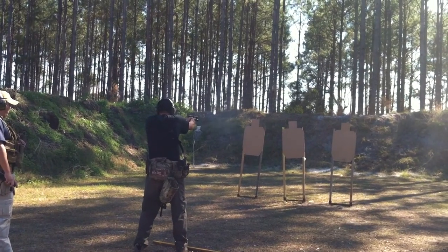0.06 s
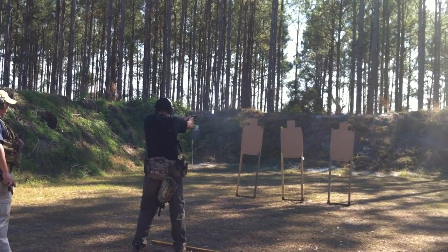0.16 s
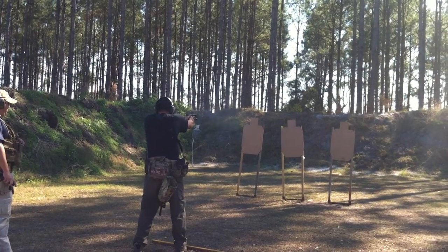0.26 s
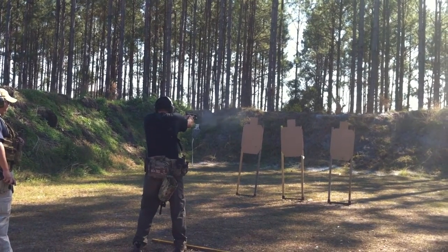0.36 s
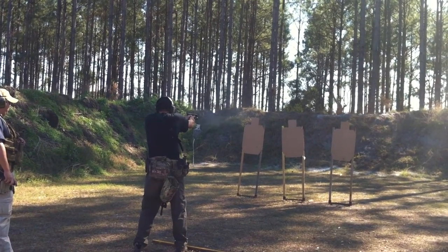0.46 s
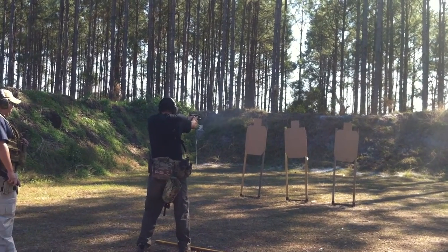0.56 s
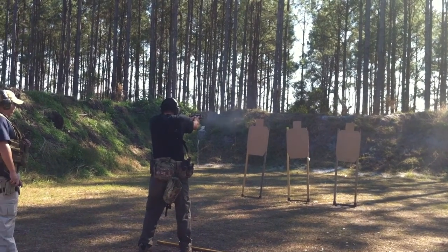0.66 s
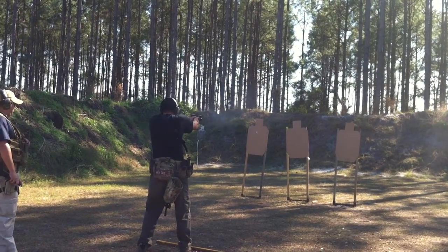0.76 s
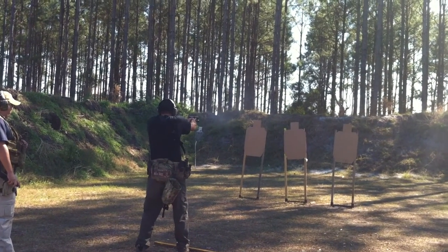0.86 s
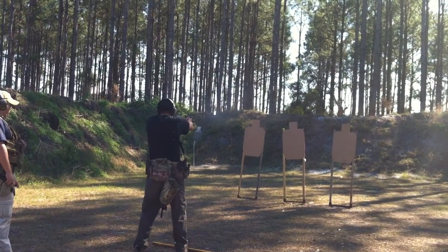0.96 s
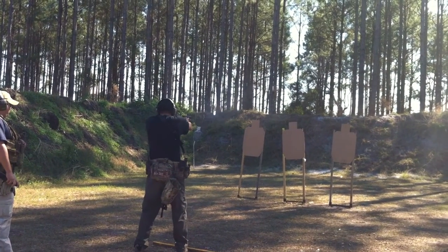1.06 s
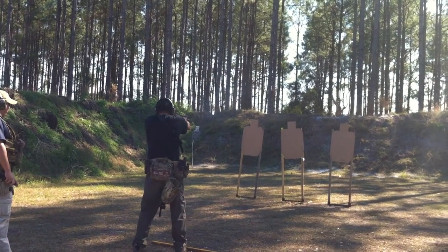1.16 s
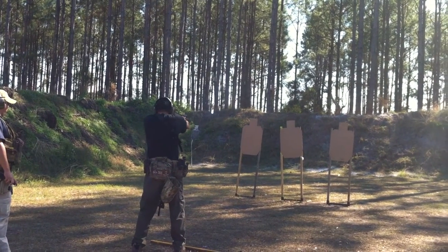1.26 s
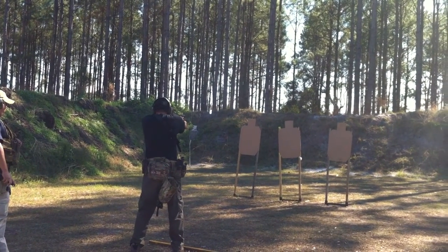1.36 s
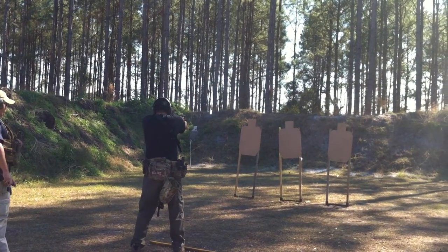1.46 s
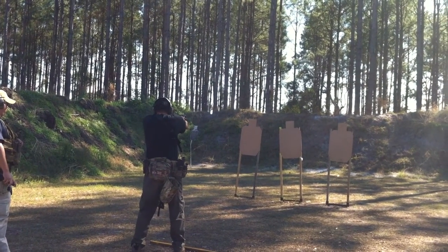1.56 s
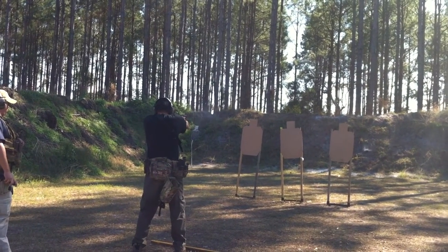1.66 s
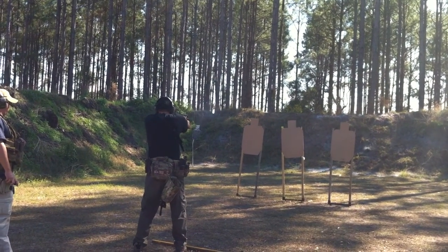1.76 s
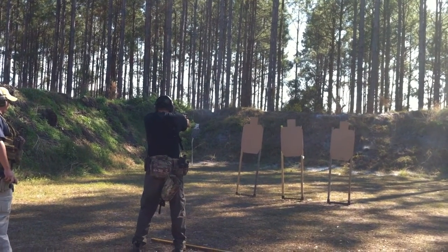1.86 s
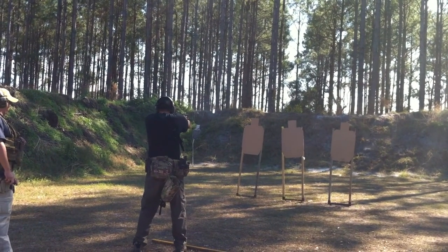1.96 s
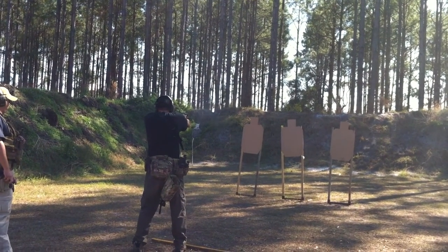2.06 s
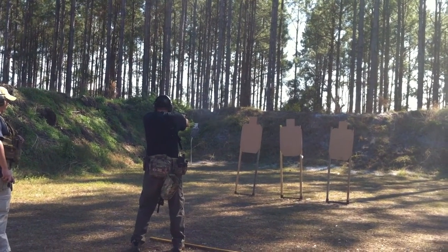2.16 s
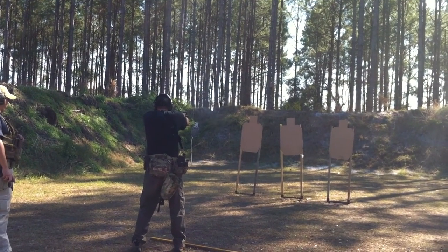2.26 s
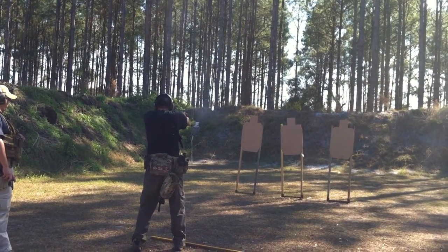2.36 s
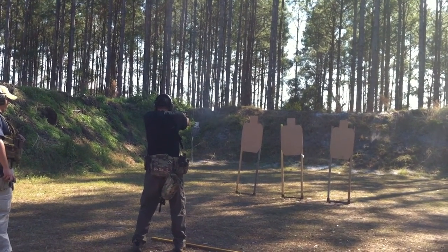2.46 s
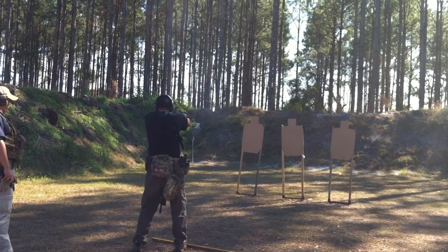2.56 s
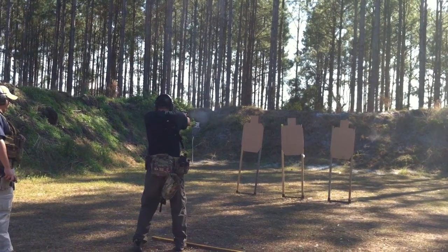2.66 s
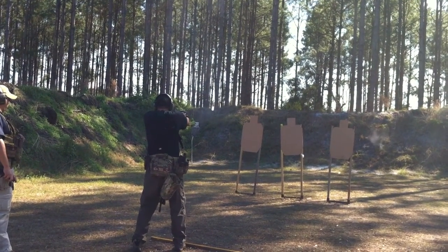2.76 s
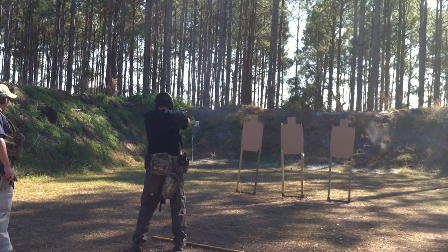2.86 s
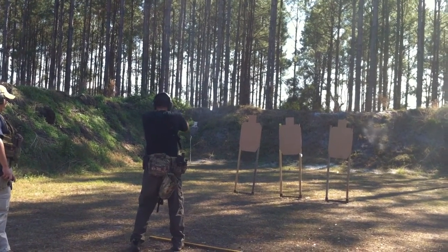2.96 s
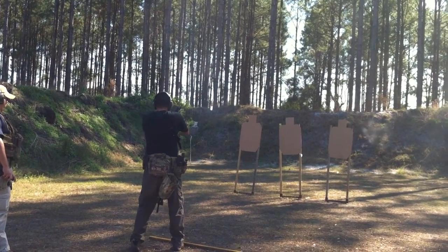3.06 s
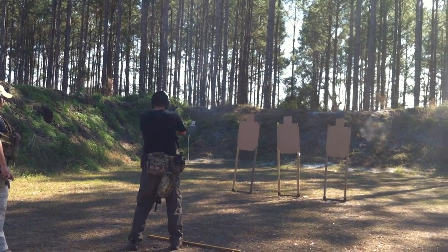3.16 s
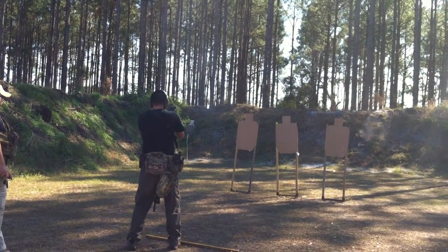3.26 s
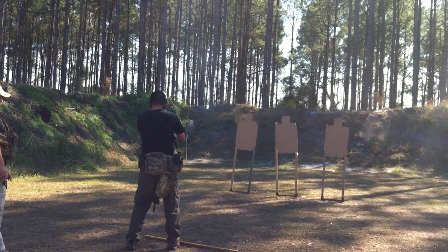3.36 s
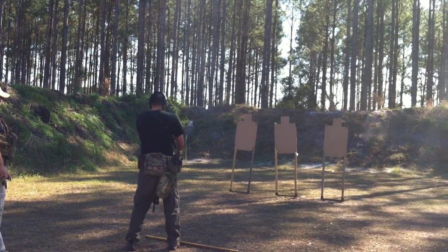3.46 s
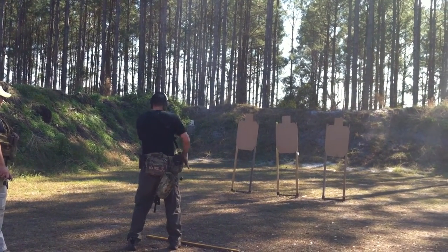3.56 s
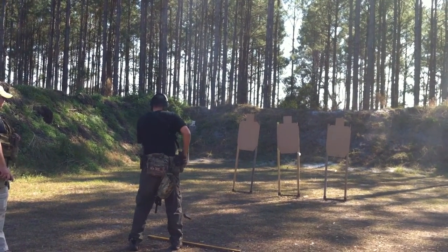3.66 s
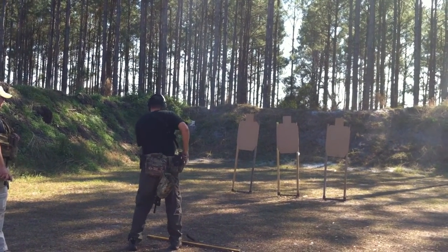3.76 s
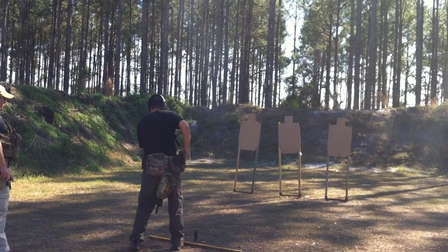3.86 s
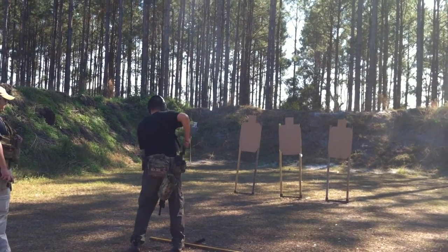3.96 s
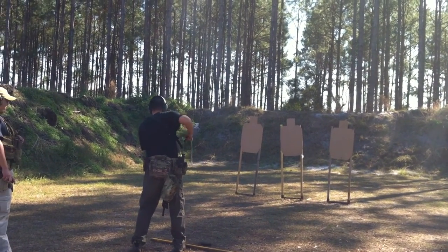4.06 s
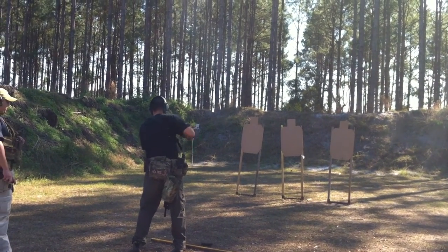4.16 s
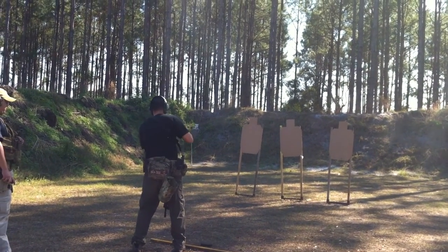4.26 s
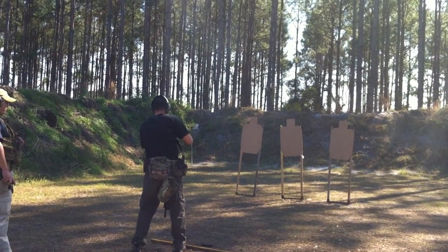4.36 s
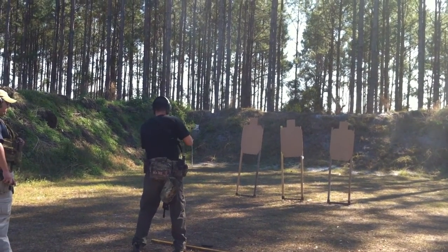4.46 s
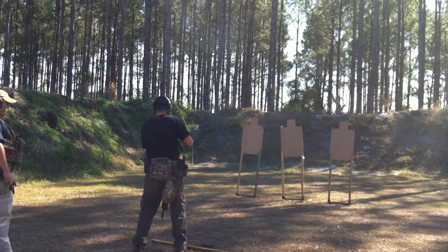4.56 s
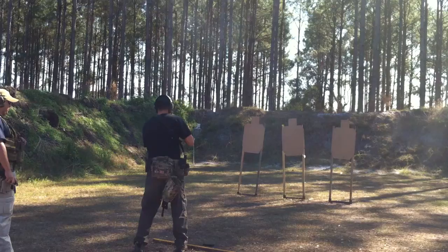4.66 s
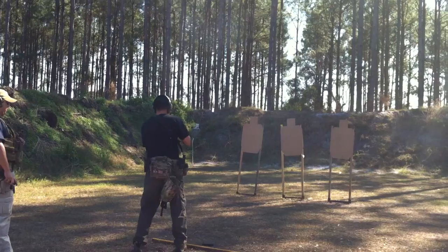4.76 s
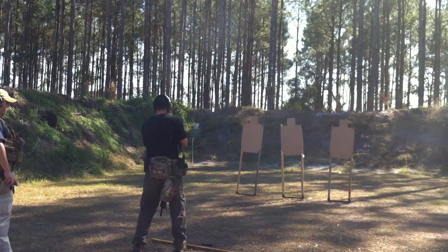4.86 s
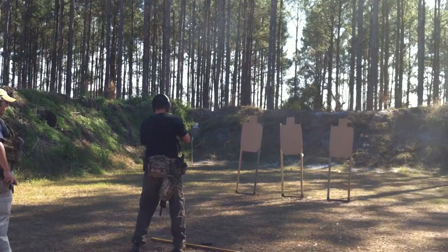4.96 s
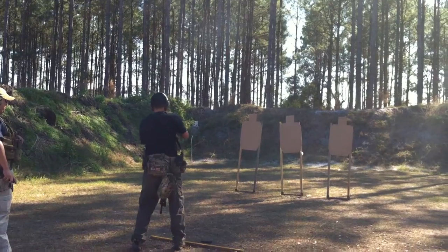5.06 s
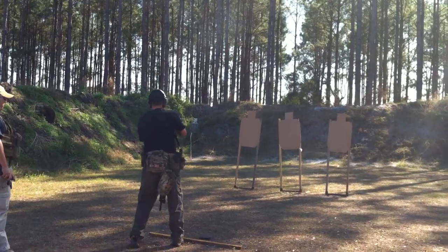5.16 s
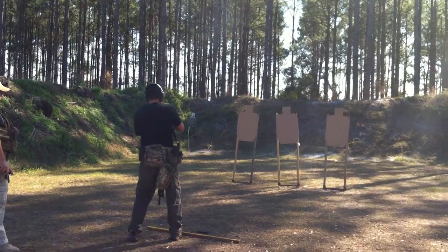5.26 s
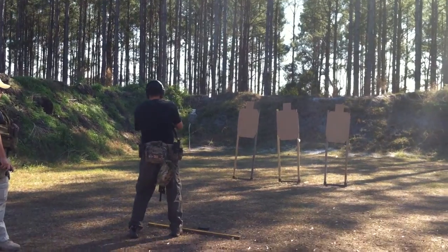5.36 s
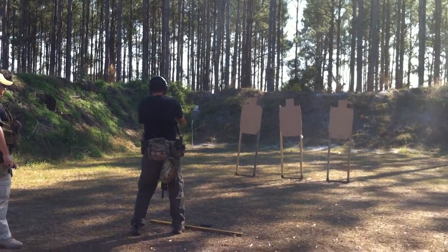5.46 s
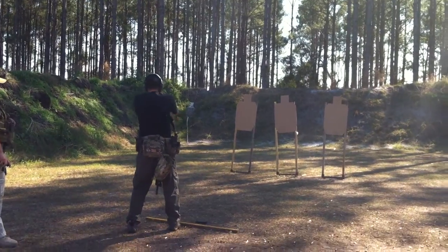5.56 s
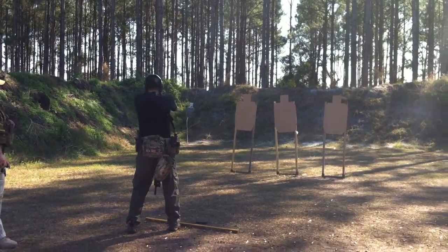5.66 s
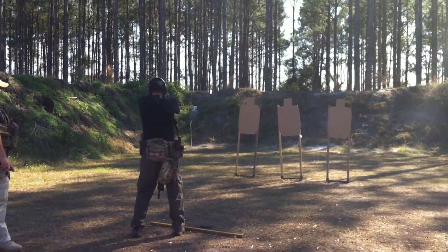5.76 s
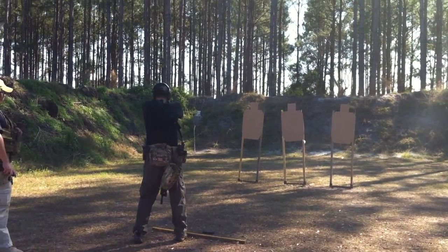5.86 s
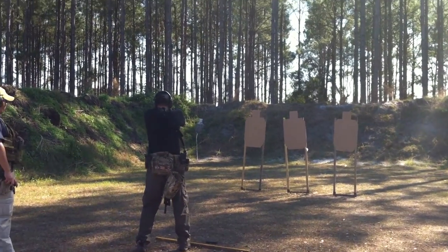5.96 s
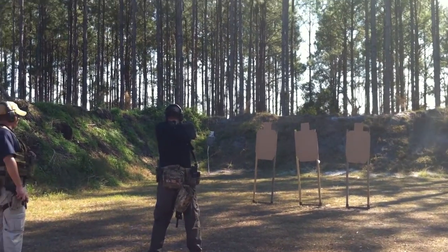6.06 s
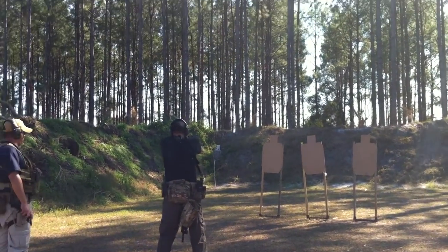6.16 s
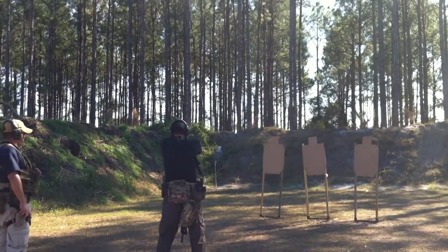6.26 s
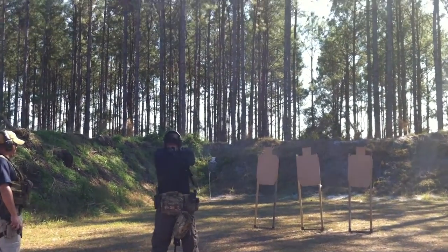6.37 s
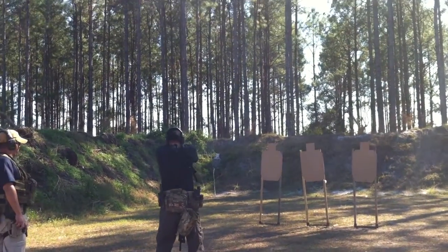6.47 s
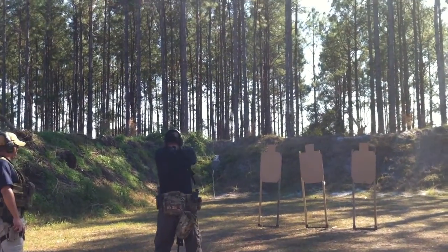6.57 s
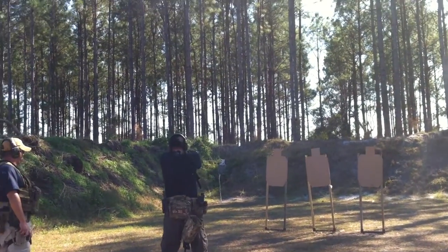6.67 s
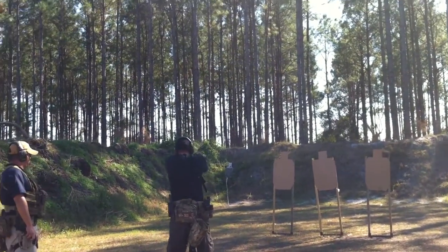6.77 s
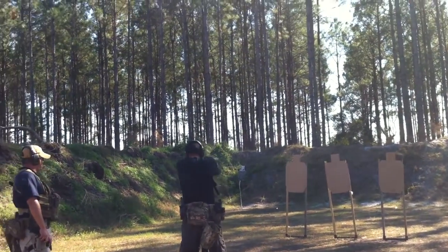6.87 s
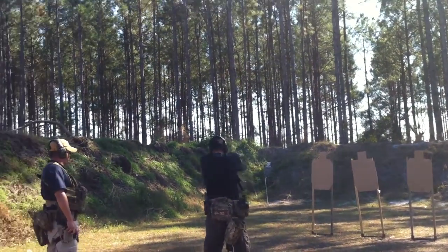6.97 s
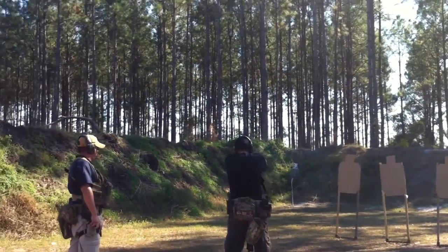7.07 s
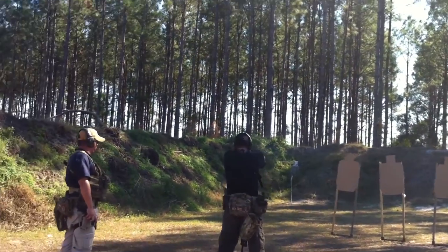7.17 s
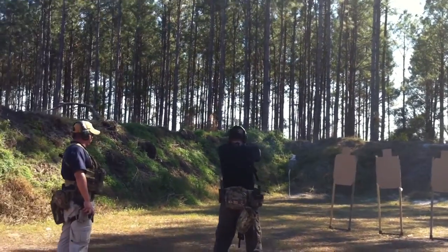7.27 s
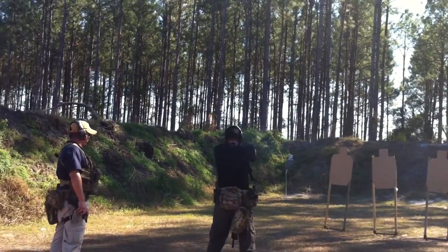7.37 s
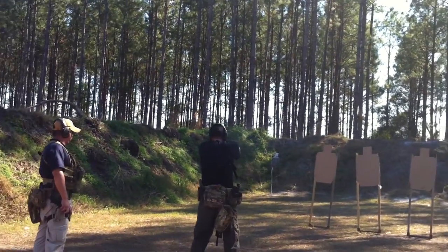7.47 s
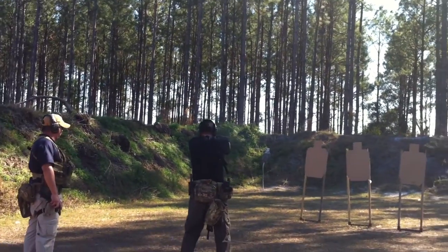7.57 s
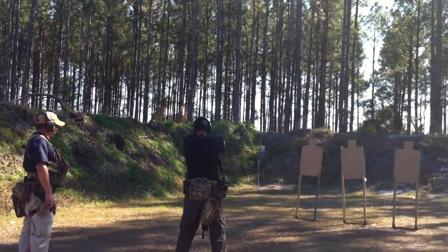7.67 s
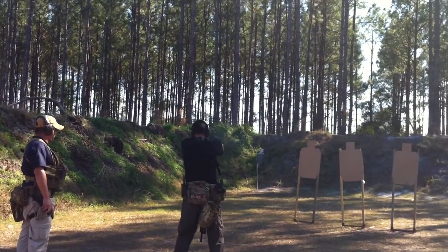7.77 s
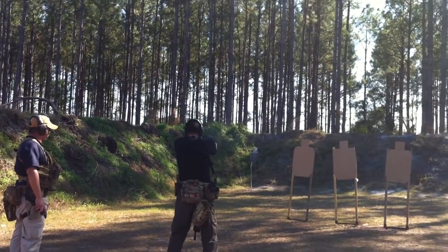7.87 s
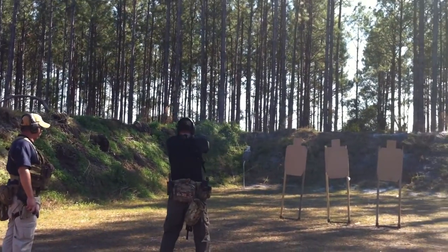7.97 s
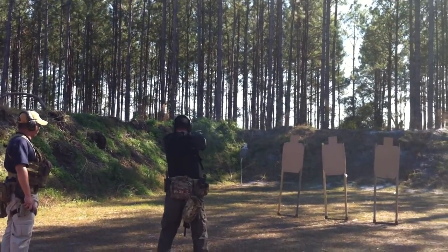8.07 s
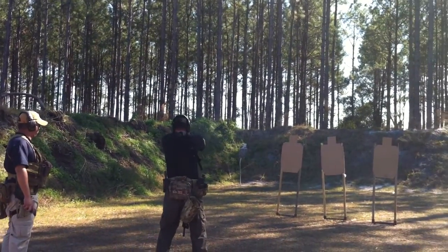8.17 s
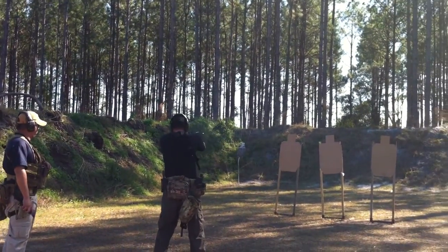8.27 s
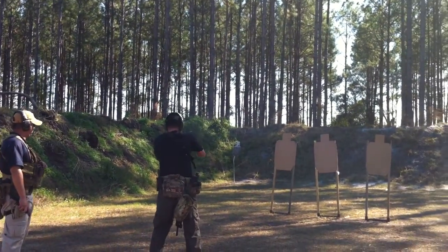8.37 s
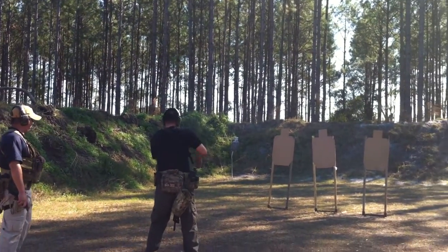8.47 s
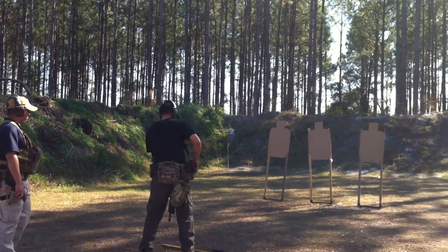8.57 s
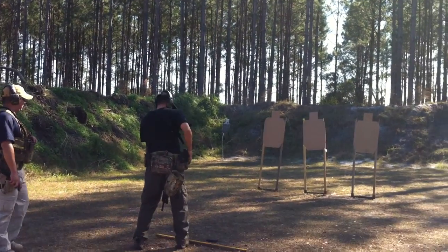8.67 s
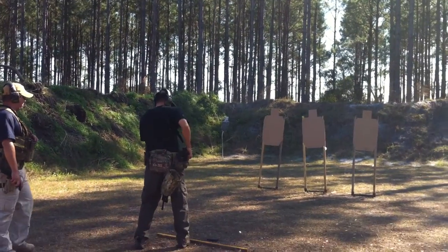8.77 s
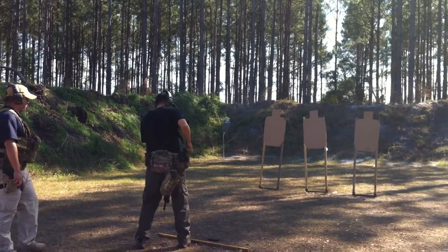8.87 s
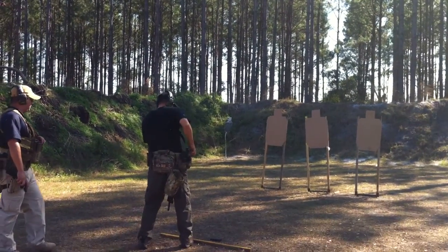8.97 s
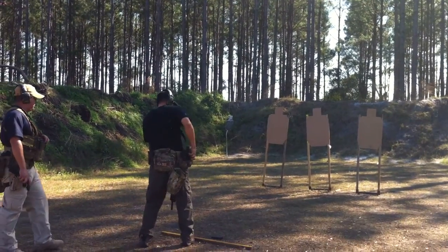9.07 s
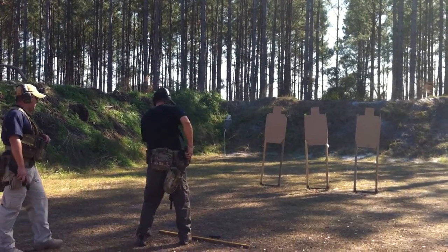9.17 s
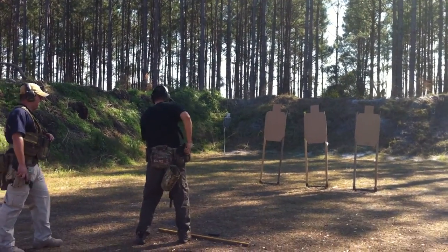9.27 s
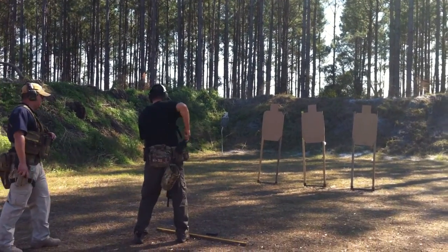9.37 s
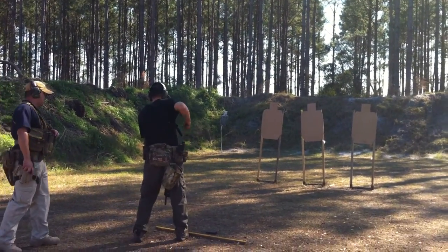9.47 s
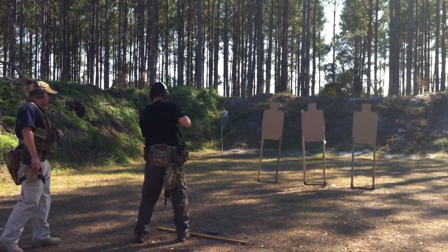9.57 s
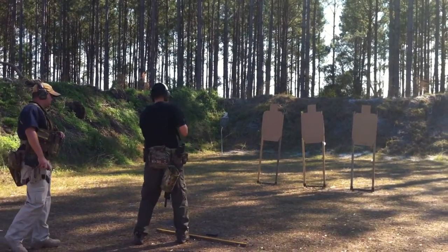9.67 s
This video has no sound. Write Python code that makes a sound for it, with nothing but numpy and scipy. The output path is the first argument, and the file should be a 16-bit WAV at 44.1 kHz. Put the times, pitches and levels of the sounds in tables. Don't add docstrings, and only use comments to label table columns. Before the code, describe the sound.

An outdoor range among pines, heard on a small camera microphone a few metres behind the shooter. An earlier shot's roll is still dying as three flat, overloaded pistol cracks come at 0.1, 0.5 and 0.8 seconds. Spent cases tinkle faintly at 1.2 and 1.6. Four more shots follow at 1.8, 2.1, 2.5 and 2.8. Each has a low thump, fast slaps from target stands and earth bank, and a roll through trees. From 3.4 to 6 the pistol is reloaded: small clicks, a harder one at 3.9, cloth rubs, a clack at 5.0 and the loudest ringing steel snap at 5.45. Cases tinkle at 6.4. Five shots, with weaker stand slaps, come at 6.5, 7.0, 7.4, 7.9 and 8.2. The roll fades; faint clicks at 9.2, then a tiny squeak and brass tinkles around 9.5. Distant traffic, low rumble, engine hum and hiss stay beneath, dipping after blasts.

```python
import sys
import numpy as np
from scipy import signal
from scipy.fft import rfft, irfft, next_fast_len
from scipy.io import wavfile
from scipy.ndimage import uniform_filter1d

SR = 44100
rng = np.random.default_rng(int(sys.argv[2]) if len(sys.argv) > 2 else 0)


def ratio(d):
    e = np.asarray(d, float) / 20
    return 10 ** e


def int16_out(signal):
    q = np.round(np.clip(np.atleast_2d(signal).T, -1, 1) * 32767)
    wavfile.write(sys.argv[1], SR, q.astype(np.int16))


N = 428652
T = np.arange(N) / SR


def noise(size=N):
    return rng.standard_normal(size)


def band(x, hz, width):
    return signal.lfilter(*signal.iirpeak(hz, hz / min(width, 15000), fs=SR), x)


def between(x, lo_hz, hi_hz):
    return signal.sosfilt(signal.butter(3, [lo_hz, hi_hz], "band", fs=SR, output="sos"), x)


def unit(x):
    return x / np.sqrt(np.mean(x ** 2))


def read(table, hz):
    table_hz, values = np.transpose(table)
    return np.interp(np.log(hz), np.log(table_hz), values)


def walk(rate):
    k = int(SR / rate)
    steps = np.repeat(noise(N // k + 1), k)
    return unit(uniform_filter1d(steps, k)[:N])


def fade(t60, hold=0., size=16384):
    return ratio(-60 * np.maximum(T[:size] - hold, 0) / max(t60, .002))


def add(out, s, x):
    i = int(s * SR)
    out[i:i + len(x)] += x[:len(out) - i]


def ring(hz, t60):
    return np.sin(2 * np.pi * hz * T[:16384]) * fade(t60)


def bursts(db, parts):
    out = np.zeros(16384)
    rise = np.minimum(T[:8192] / .0007, 1)
    for ms, part_db, hz, width, hold_ms, t60_ms in parts:
        gas = unit(band(noise(8192), hz, width))
        shape = rise * fade(t60_ms / 1000, hold_ms / 1000, size=8192)
        add(out, ms / 1000, ratio(db + part_db) * gas * shape)
    return out


def swells(floor_db, rows):
    power = ratio(2 * floor_db)
    for s, db, half in rows:
        power = power + ratio(2 * db) * np.exp(-((T - s) / half) ** 2)
    return 10 * np.log10(power)


def duck(depth_db, recovery_s):
    fired = np.array([-.6] + [s for s, *_ in SHOTS])
    since = T - fired[np.searchsorted(fired, T) - 1]
    return depth_db * np.exp(-(since / recovery_s) ** 2 / 2)


def hiss():
    db = -72 + duck(-16, .6) + .8 * walk(5.1)
    return ratio(db) * unit(between(noise(), 4000, 17000))


# (f/Hz, level/dB per Hz)
TRAFFIC = [(120, -30), (200, 3), (373, 7.5), (416, 3), (950, 9.5), (1250, -3), (1450, -14), (1870, -5.5),
           (4950, -23.5), (14100, -36), (16000, -33)]


def traffic():
    out, swell = 0, walk(0.65)
    for hz in 220 * 2 ** np.arange(0, 5, 1 / 3):
        db = read(TRAFFIC, hz) + 10 * np.log10(hz) + .7 * swell + walk(7.8)
        out = out + ratio(db) * unit(between(noise(), hz * .82, hz * 1.22))
    return ratio(-55) * unit(out)


# (t/s at the nearest, level/dB, half length/s)
LORRIES = [
    (1.8, -61.5, .15),
    (4.5, -64, 0.22),
    (5.4, -64.5, .5),
    (6.1, -66.5, 0.27),
    (6.55, -55, 0.28),
]


def rumble():
    db = swells(-69, LORRIES) + 2.2 * walk(8)
    return ratio(db) * (unit(between(noise(), 95, 240)) + .27 * unit(between(noise(), 25, 95)))


# (t/s, level/dB, half length/s)
REVS = [
    (.02, -64, .3),
    (2.301, -64.5, 1),
    (3.55, -58.5, 0.23),
    (3.9, -62.5, 0.28),
    (5.3, -71.5, 0.42),
]


def hum():
    db = swells(-73, REVS) + 2.2 * walk(2.7)
    hz = 134 + .8 * walk(3.0)
    return ratio(db) * np.sin(2 * np.pi * np.cumsum(hz) / SR)


def background():
    return ratio(duck(-15, 0.45)) * (traffic() + rumble() + hum()) + hiss()


# (f/Hz, level/dB per Hz)
WOODS = [(60, -40.5), (200, -13), (450, -8), (700, -8.5), (890, -2), (1120, -5.5), (1410, -11),
         (1770, -9.5), (2240, -6.5), (2820, -10.5), (3550, -14.5), (5000, -15), (9000, -24.5), (15500, -34)]
# (f/Hz, t60/s)
WOODS_T60 = [(100, 1.6), (260, 1.2), (700, 1.8), (1800, 1.35), (3000, 0.97), (4800, .95), (8000, 0.47),
             (11000, 1.2), (15000, .36)]


def woods():
    start_s, swell_s = 0.11, 0.016
    deep_db, deep_longer, deep_top_hz = -13.5, 3.1, 6000
    out, fired = 0, np.zeros(N)
    for s, *_, roll_db in SHOTS:
        fired[int((s + start_s) * SR)] = ratio(2 * roll_db)
    fired[0] = ratio(2 * -52.5)
    swell = np.exp(-1 / (swell_s * SR))
    arriving = fired
    for _ in range(2):
        arriving = signal.lfilter([1 - swell], [1, -swell], arriving)
    trunks = walk(90)
    for hz in 70 * 2 ** np.arange(0, 7.9, 1 / 3):
        t60 = read(WOODS_T60, hz)
        near = signal.lfilter([1], [1, -ratio(-120 / (t60 * SR))], arriving)
        deep = signal.lfilter([1], [1, -ratio(-120 / (deep_longer * t60 * SR))], arriving)
        power = near + ratio(2 * deep_db) / (1 + (hz / deep_top_hz) ** 4) * deep
        patches = ratio(.3 * trunks + 1.4 * walk(30))
        gain = ratio(read(WOODS, hz)) * np.sqrt(hz / 2000)
        out = out + gain * np.sqrt(power) * patches * unit(between(noise(), hz * .86, hz * 1.16))
    return out


# (t/s, length/s, level/dB)
CLOTH = [(3.44, 0.018, -61), (3.72, .04, -72), (3.791, .05, -66), (3.921, 0.042, -59), (4.05, .06, -62),
         (4.358, 0.087, -63), (4.658, .06, -62), (5.2, .06, -65.5), (5.421, 0.025, -38.5), (5.47, .1, -59),
         (5.55, 0.24, -68), (5.716, 0.09, -66), (5.978, .08, -79), (6.169, .13, -72.5), (8.9, .06, -71),
         (9.17, .07, -76.5), (9.457, 0.05, -63), (9.52, 0.097, -75)]
# (t/s, length/s, level/dB)
STRAP = [
    (4.09, 0.027, -65),
    (4.199, 0.25, -75),
    (4.27, .08, -69),
    (4.38, 0.09, -60.5),
    (5.17, .05, -66),
    (5.5, .22, -64.5),
]


def cloth():
    out = np.zeros(N)
    for rows, hz in (CLOTH, 9000), (STRAP, 3200):
        for s, length, db in rows:
            grain_db = 2.2 * np.repeat(rng.exponential(size=128), 64)
            fibres = noise(8192) * ratio(grain_db)
            stroke = np.sin(np.pi * np.minimum(T[:8192] / length, 1))
            add(out, s, ratio(db) * unit(band(fibres, hz, hz * 1.8)) * stroke)
    return out


def squeak():
    out = np.zeros(N)
    part = np.minimum(T[:8192] / 0.015, 1)
    chirp = np.sin(2 * np.pi * np.cumsum(1560 + 120 * part) / SR)
    add(out, 9.503, ratio(-47.5) * np.sin(np.pi * part) * chirp)
    return out


# (t/s, f/Hz, level/dB, t60/s, blur/Hz)
STEEL = [(1.59, 15550, -64, .16, 60), (5.447, 5450, -56, .6, 700), (4.987, 14200, -53, .09, 700),
         (5.446, 6800, -64, .36, 200), (5.476, 8960, -56, .25, 250), (5.475, 14120, -40, .085, 600),
         (5.565, 5400, -59, .13, 300), (4.674, 140, -44.5, .08, 140), (4.88, 2720, -63, .5, 120),
         (4.772, 5370, -57, .12, 300), (4.42, 2900, -58, .06, 500), (4.44, 2600, -59, .06, 500),
         (5.13, 2100, -56, .04, 300)]
# (t/s, f/Hz, level/dB, t60/s)
BRASS = [(1.269, 10240, -55, 0.18), (1.591, 11430, -54, 0.44), (1.708, 10440, -54, .04),
         (4.83, 11100, -59, 0.043), (5.685, 10640, -55, .04), (5.95, 10240, -63.5, .035),
         (6.018, 11200, -62, 0.048), (6.361, 10220, -52, .11), (6.372, 11140, -45, 0.086),
         (9.485, 10060, -55.5, .19), (9.506, 10200, -54, 0.13), (9.533, 11300, -54, .055),
         (9.558, 10300, -58, .08), (9.585, 10250, -53, 0.12)]


def ringing_metal():
    out = np.zeros(N)
    brass = [row + (14 / row[3],) for row in BRASS]
    for s, hz, db, t60, blur in STEEL + brass:
        mode = band(band(noise(16384), hz, blur), hz, blur)
        add(out, s, ratio(db) * unit(mode) * fade(t60))
    return out


# (t/s, level/dB, brightness/dB)
CLICKS = [(3.456, -60, -4), (3.5382, -52, 0), (3.8194, -58, -4), (3.9185, -33.5, 0.2), (3.934, -65, -8),
          (4.154, -43.5, -3), (4.206, -47.5, 6), (4.279, -64, -6), (4.3902, -52, 2), (4.4159, -54.5, -12),
          (4.596, -54, -1), (4.6807, -47, 9.5), (4.7688, -47, -5), (4.8007, -52, -3), (4.9848, -30, 1.2),
          (5.0173, -40.5, 0), (5.1295, -61, -13), (5.23, -57.5, -1.1), (5.3117, -56, 4),
          (5.3343, -39.5, 1.3), (5.445, -24, 6.5), (5.474, -34.5, 5), (5.6844, -63, .6),
          (5.7847, -54.5, -1.5), (5.989, -65, 7), (9.1783, -60, 1), (9.23, -64.5, -1)]
# (t/s, level/dB, brightness/dB)
TICKS = [(1.2091, -54, 11), (1.59, -41.5, 10.5), (1.7081, -62, 8), (6.3606, -55.5, 16), (7.752, -35.5, 0),
         (9.5054, -59, 12), (9.5342, -63.5, 15), (9.559, -62, 8), (9.573, -62, 12), (9.5867, -60, 9),
         (9.628, -63, 3)]


def clicks():
    out = np.zeros(N)
    for rows, t60 in (CLICKS, 0.049), (TICKS, .025):
        for s, db, bright_db in rows:
            grit = noise(8192) * fade(t60, 0.0016, size=8192)
            modes = sum(band(grit, hz, hz / 10) for hz in 1500 * 10 ** rng.random(size=5))
            grit = grit / 2 + ratio(3) * modes / 2
            add(out, s, 1.3 * ratio(db) * between(grit, 2500, 7000))
            add(out, s, .9 * ratio(db - 3.5 + bright_db) * between(grit, 7000, 16000))
            add(out, s, 2.2 * ratio(db + 1 - bright_db) * between(grit, 500, 2700))
    return out


def handling():
    return clicks() + ringing_metal() + squeak() + cloth()


def aimed(aim, at_0, at_1):
    return at_0 + aim * (at_1 - at_0)


# (delay/ms, level/dB, f/Hz, width/Hz, hold/ms, t60/ms)
FAR_BANK = [
    (38.3, -2.5, 378, 350, 57, 260),
    (50.7, -9, 500, 2800, 5.8, 40),
    (90.4, -3, 760, 1700, 15, 35),
    (74.2, -18.5, 9000, 9000, 52, 570),
]


def far_bank(aim, roll_db):
    return bursts(roll_db + aimed(aim, 6, 3.5), FAR_BANK)


# (delay/ms, level/dB, f/Hz, width/Hz, hold/ms, t60/ms)
STANDS = [
    (62, -22, 3000, 5000, 3, 20),
    (66.5, -7, 6000, 9000, .3, 6),
    (71.8, -6, 6000, 10000, .3, 6),
    (122, -25, 6000, 9000, .4, 8),
]
# (delay/ms, level/dB, f/Hz, t60/ms)
BOARDS = [
    (66.3, -5, 2300, 8),
    (71.6, -2, 2350, 8),
]


def target_stands(aim):
    stands_db = aimed(aim, -2.5, -26.5)
    out = bursts(stands_db, STANDS)
    for ms, db, hz, t60_ms in BOARDS:
        add(out, ms / 1000, ratio(stands_db + db) * ring(hz, t60_ms / 1000))
    return out


# (delay/ms, level/dB, f/Hz, width/Hz, hold/ms, t60/ms)
BANK_CRACK = [(0, -1, 4000, 7920, 3.2, 7), (3, -23.5, 2490, 7870, 4, 200)]
BANK_FACE = [(7.3, .01, 2000, 6000, 1.5, 9.1)]
BANK_BOOM = [(4, -3.5, 240, 330, 2.4, 26), (6, -8.5, 600, 650, 13, 41)]


def earth_bank(aim, hz):
    t, sag = T[:16384], 450.
    turns = 1.5 * hz * (t / 2 + (1 - np.exp(-sag * t)) / sag / 2)
    swings = -np.sin(2 * np.pi * turns) * np.minimum(.7 + t / .004, 1) * fade(.006, .0026)
    out = ratio(aimed(aim, -3.5, 1)) * swings
    out += bursts(aimed(aim, -7, -17), BANK_CRACK)
    out += bursts(aimed(aim, -16, -29.5), BANK_FACE)
    return out + bursts(aimed(aim, -11, -17.5), BANK_BOOM)


# (delay/ms, level/dB, f/Hz, t60/ms)
THUMP = [
    (3.2, -1, 340, 24),
    (6.5, -8.5, 270, 28),
    (3, -18, 200, 150),
]


def thump(aim):
    out = np.zeros(16384)
    for ms, db, hz, t60_ms in THUMP:
        add(out, ms / 1000, ratio(aimed(aim, -8, -5) + db) * ring(hz, t60_ms / 1000))
    return out


# (delay/ms, level/dB, f/Hz, width/Hz, hold/ms, t60/ms)
CRACK = [
    (0.5, -8, 2900, 1000, 3.5, 7),
    (1, -6, 3100, 26000, 1.9, 13),
    (5.9, -13, 1000, 2100, 1.1, 20),
    (0.5, -12, 750, 980, 8, 41.6),
    (12, -26.5, 900, 930, 11, 20),
]
LEAD = [(0, -30, 9000, 14000, 6.3, 3.7)]
# (t/s, aim 0-1 swinging away from the stands, bank slap f/Hz, roll level/dB)
SHOTS = [(0.0842, 0.13, 800, -33.5), (0.4686, 0, 820, -32), (0.8155, 0.09, 770, -32.5),
         (1.7656, 0.32, 910, -32), (2.1474, 0.37, 910, -32), (2.4958, 0.37, 815, -32),
         (2.8416, 0.5, 877, -34), (6.512, 0.73, 880, -35), (7, 0.83, 933, -37.5), (7.4045, 0.81, 890, -38),
         (7.8878, 0.91, 893, -37.5), (8.2156, 0.54, 865, -33.5)]


def blasts():
    out = np.zeros(N)
    for s, aim, slap_hz, roll_db in SHOTS:
        crack_db = aimed(aim, 0.3, -3)
        add(out, s - .004, bursts(crack_db, LEAD))
        add(out, s, bursts(crack_db, CRACK) + thump(aim))
        add(out, s, target_stands(aim) + far_bank(aim, roll_db))
        add(out, s + aimed(aim, 27.6, 27.4) / 1000, earth_bank(aim, slap_hz))
    return out


def scene():
    return (background() + woods() + handling() + blasts())[None]


# (band from f/Hz, level/dB under the attack)
STARVED = [
    (0, 32.5),
    (1700, 20.5),
    (5000, 18),
    (9000, 13.5),
]


def starve(x, top_hz):
    frame, block, grid = 1024, 128, 662
    size, count, out = next_fast_len(N), (N - grid) // frame, 0
    end = grid + count * frame
    hz = np.arange(size // 2 + 1) * SR / size
    spectra = rfft([x, noise()], size)
    spectra[1] *= (hz > 600) * (hz < top_hz)
    splits = [1 / (1 + (hz / edge) ** 8) for edge, _ in STARVED[1:]]
    under = [0 * hz] + splits + [1 + 0 * hz]

    def spread(blocks):
        gain = np.pad(np.repeat(blocks, block), (grid, N - end), "edge")
        return uniform_filter1d(gain, size=48)

    for k, (_, under_db) in enumerate(STARVED):
        part, grain = irfft(spectra * (under[k + 1] - under[k]), size)[:, :N]
        level = np.sqrt(np.mean(part[grid:end].reshape(count, -1, block) ** 2, axis=2))
        coming = np.maximum.accumulate(level[:, ::-1], axis=1)[:, ::-1]
        lost = (level < coming * ratio(-under_db)).ravel()
        smear = lost * np.roll(level.ravel(), -1) * ratio(-29)
        out = out + spread(1. - lost) * part + spread(smear) * unit(grain)
    return out


def band_limit(x):
    return signal.sosfilt(signal.butter(12, 16980, fs=SR, output="sos"), x)


def record(dry):
    overload, top_hz = .62, 15800
    x = overload * np.tanh(dry[0] / overload)
    x = signal.sosfilt(signal.butter(2, 90, "high", fs=SR, output="sos"), x)
    x = signal.sosfilt(signal.ellip(8, .5, 40, top_hz, fs=SR, output="sos"), x)
    mix = starve(x, top_hz)[None]
    return band_limit(mix)


dry = scene()
out = record(dry)
int16_out(out)
```